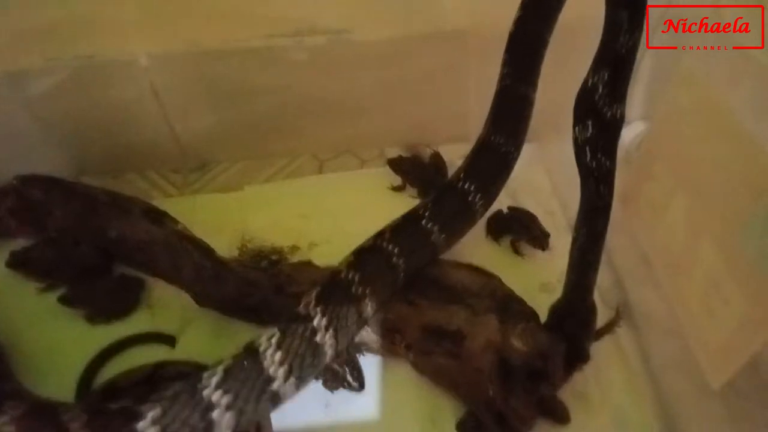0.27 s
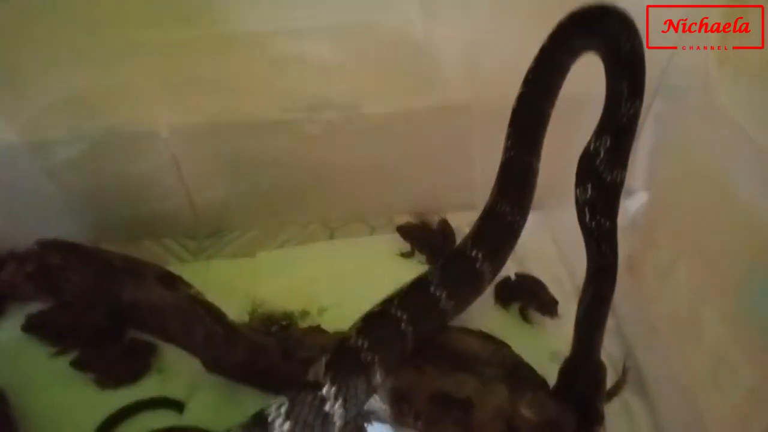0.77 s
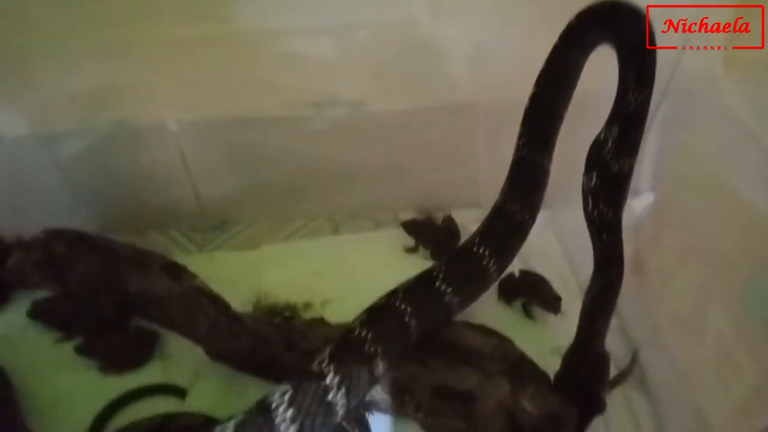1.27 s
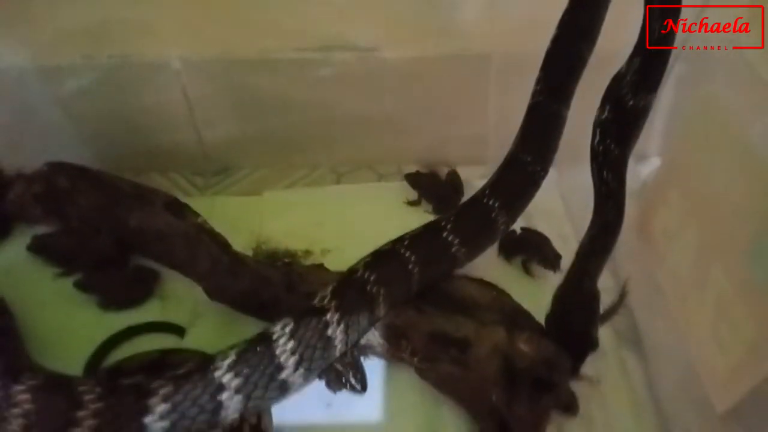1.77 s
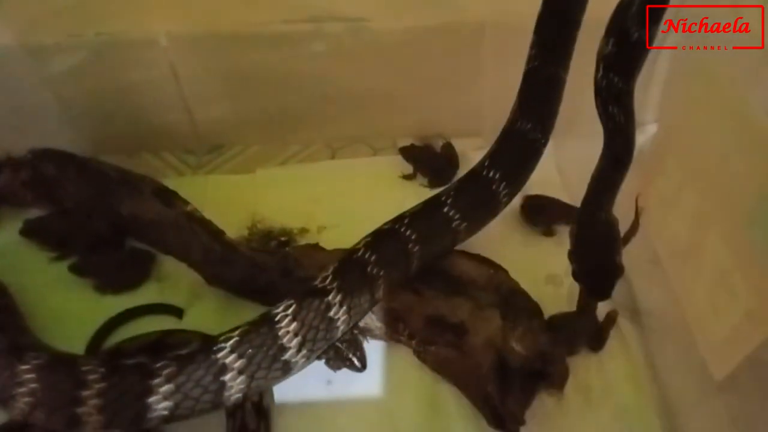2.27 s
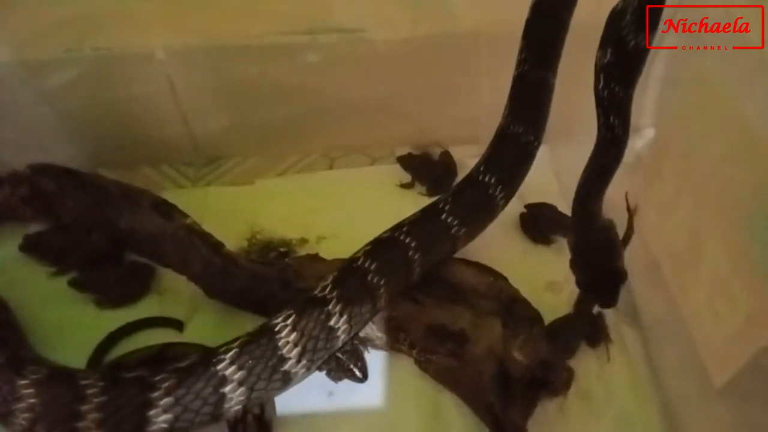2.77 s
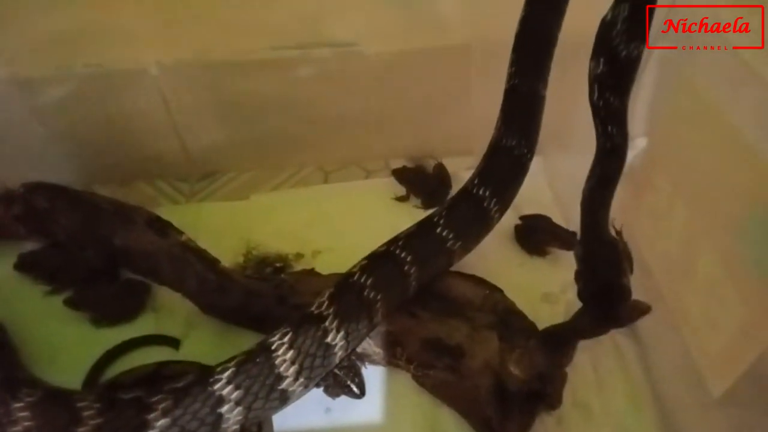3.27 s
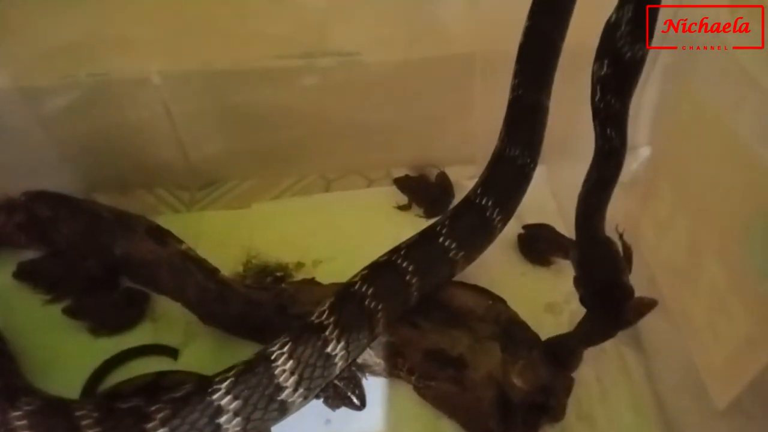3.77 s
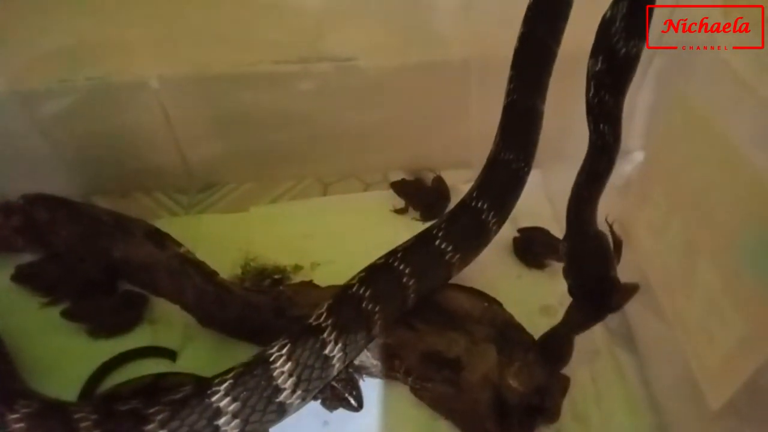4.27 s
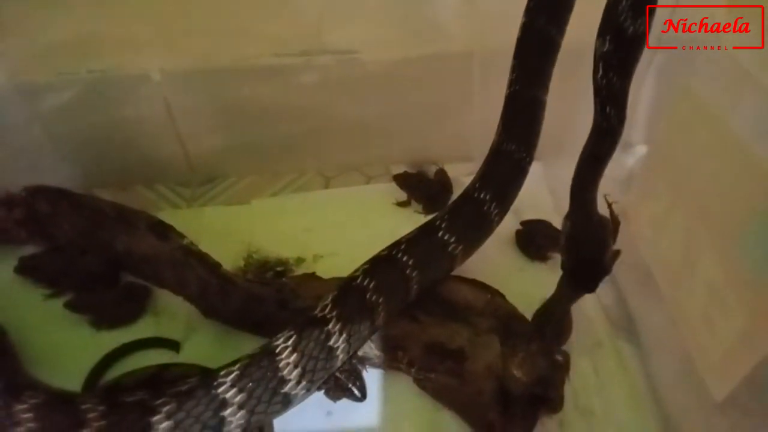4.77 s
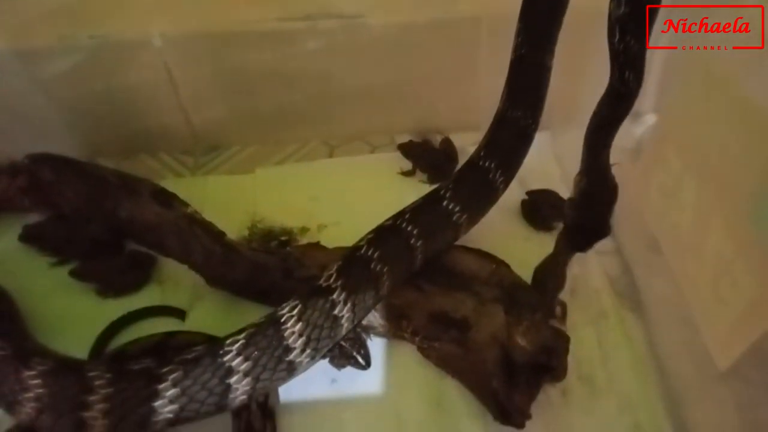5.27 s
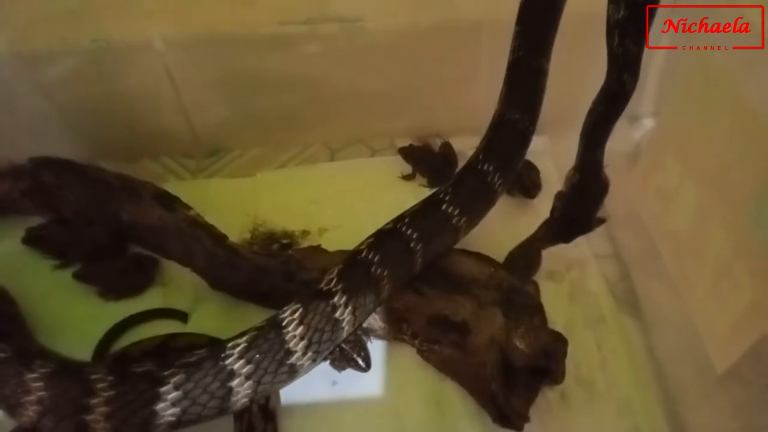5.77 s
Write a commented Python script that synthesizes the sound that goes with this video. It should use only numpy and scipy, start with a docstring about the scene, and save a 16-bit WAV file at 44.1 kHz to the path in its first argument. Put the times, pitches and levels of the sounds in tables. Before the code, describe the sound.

Faint rustling and a hoarse little croak lead into a harsh, shrill frog scream. A snake and the struggling frog slide and knock against a plastic tank, then the frog screams four more times in uneven bursts, with thin squeals and scattered clicks. The cries are loud and very near the microphone, with a boxy ring and a short room echo; the gaps are quiet.

```python
"""Frog seized by a snake

A small frog in a plastic tank screams five times, close to an overloaded microphone. Its larynx fires
rough pulses into throat and mouth resonances; thin squeals lead into some screams, and tank and room
ring after them. In between come croaks and dry ticks; the struggling animals slide, scrape and bump."""
import sys
import numpy as np
from scipy import signal
from scipy.fft import rfft, irfft
from scipy.io import wavfile

SR = 44100
rng = np.random.default_rng(int(sys.argv[2]) if len(sys.argv) > 2 else 0)


def digitize_waveform(pressure):
    """Quantize a signal to 16-bit integers and store it at the path in sys.argv[1].

    Rows of a 2-D input are taken as channels; values are limited to [-1, 1].
    """
    field = np.atleast_2d(pressure).T
    bounded = np.clip(field, -1, 1)
    quanta = np.round(bounded * 32767).astype(np.int16)
    wavfile.write(sys.argv[1], SR, quanta)


N = 264952
TIME = np.arange(N) / SR


def from_db(db):
    return 10 ** (np.asarray(db) / 20)


def unit_rms(x):
    return x / np.sqrt(np.mean(x ** 2) + 1e-20)


def columns_at(rows, t):
    """Each column of a curve table at times t."""
    times, *columns = np.transpose(rows)
    return [np.interp(t, times, column) for column in columns]


def at_hz(points, hz):
    """Table lookup on a log-frequency axis."""
    points_hz, values = np.transpose(points)
    return np.interp(np.log(hz + 1), np.log(points_hz), values)


def butter(x, hz, kind, order=2):
    return signal.sosfilt(signal.butter(order, hz, kind, fs=SR, output="sos"), x + 1e-18)


def add(out, start_s, sound):
    i = max(int(start_s * SR), 0)
    out[i:i + len(sound)] += sound[:max(N - i, 0)]


def wander(hz, samples=N):
    """Low-passed noise, rms 1."""
    return unit_rms(butter(rng.standard_normal(samples), hz, "low"))


def coloured_noise(colour):
    """Steady noise of a given spectrum, rms 1."""
    gain = from_db(at_hz(colour, np.fft.rfftfreq(N, 1 / SR)))
    return unit_rms(irfft(rfft(rng.standard_normal(N)) * gain, N))


def dying_noise(colour, t60s, tilt_db_per_octave=0):
    """Dense modes, each half octave decaying at its own rate; 1 s, energy 1."""
    t, out = TIME[:SR], 0
    edges_hz = 45 * 2 ** (np.arange(18) / 2)
    for low, high in zip(edges_hz, edges_hz[1:]):
        hz = np.sqrt(low * high)
        band = butter(rng.standard_normal(SR), [low, high], "band")
        gain = from_db(at_hz(colour, hz) + tilt_db_per_octave * np.log2(hz))
        out = out + band * gain * from_db(-60 * t / at_hz(t60s, hz))
    return out / np.linalg.norm(out)


# Snake's moves: (centre [s], half length [s], rumble [dB], rustle [dB])
BODY_MOVES = [(0.376, 0.17, -49.5, -53.5), (1.098, 0.25, -62.5, -56.5), (1.794, 0.22, -56.5, -70.5),
              (2.23, 0.096, -48, -51.5), (2.441, 0.107, -49.5, -49.5), (4.889, 0.11, -73.5, -57.5),
              (5.112, 0.026, -76, -50.5)]
# Sliding spectra: (frequency [Hz], density [dB])
RUMBLE_SPECTRUM = [(30, -16), (60, -7.5), (100, 5), (150, -3), (220, -19), (400, -20.5), (1000, -35.5),
                   (8000, -64.5)]
RUSTLE_SPECTRUM = [(200, -7.5), (800, -8), (1500, 7.5), (3500, 0.5), (5500, -15.5), (9000, -27.5),
                   (15000, -38)]


def sliding_bodies(rumble_floor_db=-67, rustle_floor_db=-75.5, hiss_db=-82, swell_db=2.5, grain_db=2.0):
    """Lumpy rumble and faint rustle swell with each move, over microphone hiss; all fade in and out."""
    rumble_gain, rustle_gain = from_db(rumble_floor_db), from_db(rustle_floor_db)
    for centre_s, half_s, rumble_db, rustle_db in BODY_MOVES:
        motion = np.exp(-((TIME - centre_s) / half_s) ** 2)
        rumble_gain = np.hypot(rumble_gain, from_db(rumble_db) * motion)
        rustle_gain = np.hypot(rustle_gain, from_db(rustle_db) * motion)
    swell = from_db(swell_db * wander(hz=2.7))
    grain = from_db(grain_db * wander(hz=40))
    hiss = from_db(hiss_db) * rng.standard_normal(N)
    rumble = rumble_gain * swell * coloured_noise(RUMBLE_SPECTRUM)
    rustle = rustle_gain * grain * coloured_noise(RUSTLE_SPECTRUM)
    fade_in = np.interp(TIME, (0.104, 0.12), (.01, 1))
    fade_out = from_db(-33.5 * np.maximum(TIME - 5.42, 0))
    return fade_in * fade_out * (hiss + rumble + rustle)


def ping(hz, width_hz, delay_s=0):
    """A damped resonance answers one pulse, swelling and dying in a few cycles; energy 1."""
    t = np.maximum(TIME[:SR // 100] - delay_s, 0)
    wave = t ** 2 * np.exp(-np.pi * width_hz * t) * np.sin(2 * np.pi * hz * t)
    return wave / np.linalg.norm(wave)


def twin_ping(hz, delay_s=0, width_hz=1400, upper_db=-2.5):
    """Two resonances either side of hz, moving together; energy 1."""
    lower = ping(hz * 0.904, width_hz, delay_s)
    upper = from_db(upper_db) * ping(hz * 1.2036, width_hz, delay_s)
    return (lower - upper) / np.linalg.norm(lower - upper)


# Ticks: (time [s], level before high-pass [dB], high ring re low ring [dB])
TICKS = [(0.209, -31, -15.5), (0.2626, -40.5, -14.5), (0.332, -30.5, -19), (0.411, -27.5, -6.5),
         (1.117, -19, -18), (1.1516, -20.5, -23), (2.111, -28, -10.5), (3.3794, -19, -16),
         (3.8421, -18, -14), (3.922, 0.5, -3.5), (4.3925, -31, -8.5), (4.8632, -13.5, -22),
         (4.9204, -26.5, -3), (5.0052, -37.5, -6)]


def ticks(gain_db=-0.5):
    """Faint ticks in the opening rustle, then scattered clicks; each a brief low and high ring."""
    out = np.zeros(N)
    for start_s, level_db, high_db in TICKS:
        pulse = ping(hz=1500, width_hz=610) + from_db(high_db) * twin_ping(hz=3100)
        add(out, start_s, from_db(level_db + gain_db) * pulse / np.abs(pulse).max())
    return butter(out, 1900, "high", order=4)


# Slips on the plastic: (centre [s], half length [s], level [dB])
SLIPS = [(0.405, 0.016, -58.5), (2.159, 0.029, -51.5), (2.509, 0.0063, -44.5), (3.098, 0.04, -59),
         (5.526, 0.013, -60)]
# Scrape spectrum: (frequency [Hz], density [dB])
SCRAPE_SPECTRUM = [(1000, -22), (3000, -6), (6500, 0.5), (10000, -20.5), (15000, -12.5)]


def scrapes(grain_db=4.0):
    """Scales and toes slip over the plastic with a bright, grainy hiss."""
    contact = sum(from_db(db) * np.exp(-((TIME - s) / half_s) ** 2) for s, half_s, db in SLIPS)
    grain = from_db(grain_db * wander(hz=150))
    return contact * grain * coloured_noise(SCRAPE_SPECTRUM)


def larynx(controls, low_cut_hz, flank_db, bite_db, bite_ratio, shimmer_db=7, rasp=0.08):
    """The larynx snaps open once a cycle; strain scatters the timing and strength of the snaps."""
    out, time_s = np.zeros(N), controls[0][0]
    for timing, strength, balance in np.clip(rng.standard_normal((400, 3)), -2, 2):
        if time_s > controls[-1][0]:
            break
        rate_hz, jitter, throat_db, throat_hz, mouth_db, mouth_hz = columns_at(controls, time_s)
        delay_s = time_s * SR % 1 / SR
        period_s = np.exp((jitter + 0.013) * timing / 2) / max(rate_hz, 20)
        scatter_db = shimmer_db * jitter
        throat = ping(throat_hz, width_hz=1300, delay_s=delay_s)
        throat *= from_db(throat_db + scatter_db * balance)
        mouth = from_db(mouth_db) * twin_ping(mouth_hz, delay_s)
        bite = ping(mouth_hz * bite_ratio, width_hz=1700, delay_s=delay_s)   # weak high resonance
        pulse = butter(throat + mouth, 1.5 * mouth_hz, "low", order=6)
        pulse += from_db(mouth_db + bite_db) * bite
        pulse *= 1 + rasp * rng.standard_normal(len(pulse))   # turbulence
        pulse *= np.sqrt(SR * period_s)   # longer cycles pass more air
        add(out, time_s, pulse * from_db(scatter_db * strength))
        time_s += period_s
    flanks = from_db(flank_db) * butter(out, (520, 860), "band", order=4)   # leak through the skin
    softened = butter(out, 5900, "low", order=4)
    return flanks + butter(softened, low_cut_hz, "high", order=8)   # a small body radiates no bass


# Croaks: (start [s], length [s], pulse rate [Hz], jitter [cycles], throat [dB], mouth [dB],
# bite re mouth [dB], low cut [Hz], flank leak [dB])
CROAK_PUSHES = [(0.543, 0.023, 305, 0.19, -20, -26, -13, 1100, -13),
                (0.581, 0.064, 295, .07, -14.5, -18, -13.5, 1100, -7),
                (2.131, 0.012, 330, 0.1, -29.5, -30.5, -22, 1268, -28),
                (3.888, 0.026, 200, .15, -21, -27, -19, 1290, -22)]


def croak(push, sag=0.16, arch_db=5.5, throat_hz=1510, mouth_hz=3100):
    """A hoarse push through a nearly closed mouth swells and fades as its pitch sags."""
    start_s, length_s, rate_hz, jitter, throat_db, mouth_db, bite_db, low_cut_hz, flank_db = push
    controls = []
    for progress in np.linspace(0, 1, 11):
        dip_db = arch_db * (2 * progress - 1) ** 2
        pitch_hz = rate_hz * (1 - sag * (progress - .5))
        controls.append((start_s + progress * length_s, pitch_hz, jitter,
                         throat_db - dip_db, throat_hz, mouth_db - dip_db, mouth_hz))
    return larynx(controls, low_cut_hz, flank_db, bite_db, bite_ratio=2.05)


# Screams: (start [s], mouth shuts [s], throat [dB], throat resonance [Hz], mouth [dB],
# mouth resonance [Hz], midway slack [dB], tiring loss [dB], bite re mouth [dB], low cut [Hz],
# flank leak [dB])
SCREAM_PUSHES = [(0.648, 0.914, -20.5, 1878, -9.5, 4026, -1, 10, -10, 1250, -6.5),
                 (2.678, 2.899, -17.5, 1557, -11.5, 3690, 3, 0, -7, 1410, -29),
                 (3.58, 3.644, -19, 1630, -13.5, 3470, -3.5, 1, -16, 1400, -16.5),
                 (3.972, 4.135, -19, 1595, -16.5, 3504, -2, -4, -16, 1400, -18),
                 (5.213, 5.357, -16.5, 1714, -10.5, 4083, 1.5, 1, -16, 1408, -22)]
# Pitch and strain, one curve per scream: (time [s], pulse rate [Hz], jitter [cycles])
SCREAM_CURVES = [
    [(0.65, 282, 0.087), (0.742, 401, 0.027), (0.815, 366, 0.043), (0.878, 260, 0.055), (0.915, 503, 0.049),
     (0.945, 380, .1)],
    [(2.678, 310, 0.15), (2.7, 333, 0.085), (2.77, 244, 0.14), (2.842, 409, 0.16), (2.852, 678, 0.064),
     (2.89, 684, 0.012), (2.916, 675, 0.13), (2.94, 460, 0.31)],
    [(3.58, 292, .13), (3.615, 401, 0.08), (3.69, 293, 0.2)],
    [(3.971, 55, 0.017), (4.004, 100, 0.011), (4.09, 146, 0.033), (4.125, 282, 0.093), (4.152, 380, 0.056),
     (4.18, 213, 0.29)],
    [(5.213, 321, 0.23), (5.27, 296, .18), (5.335, 600, 0.18), (5.346, 764, .02), (5.366, 730, 0.021),
     (5.385, 690, 0.15), (5.4, 520, .15)],
]


def scream(push, curve, release_s=0.044, throat_db_per_s=330, mouth_db_per_s=847.5):
    """One open-mouthed push darkens as the frog tires; the mouth shuts, the throat dies away after it."""
    (start_s, shut_s, throat_db, throat_hz, mouth_db, mouth_hz,
     slack_db, tiring_db, bite_db, low_cut_hz, flank_db) = push
    t = np.arange(start_s, shut_s + release_s, 0.001)
    progress = np.minimum((t - start_s) / (shut_s - start_s), 1)
    tired = progress ** 1.8
    since_shut_s = np.maximum(t - shut_s, 0)
    boom_db = 5 * np.exp(-((t - shut_s) / 0.021) ** 2)   # the throat booms as the mouth shuts
    loss_db = slack_db * np.sin(np.pi * progress) ** 2 + tiring_db * tired
    opening = 1 - 0.1 * tired - .009 * loss_db   # the mouth narrows as effort falls
    controls = np.column_stack([
        t, *columns_at(curve, t),
        throat_db + boom_db - throat_db_per_s * since_shut_s, throat_hz * (1 - 0.03 * tired),
        mouth_db - loss_db - mouth_db_per_s * since_shut_s, mouth_hz * opening])
    return larynx(controls, low_cut_hz, flank_db, bite_db, bite_ratio=1.4)


# Knocks on the tank: (time [s], relative level [dB], tilt [dB/octave])
KNOCKS = [(1.17, -42.5, -12.5), (1.647, -53, 8.5), (2.136, -29.5, 2), (2.157, -12, -1.5), (2.33, -25, -2),
          (2.365, -29, 6)]
# Wall spectrum: (frequency [Hz], density [dB])
WALL_SPECTRUM = [(40, -12.5), (100, 7), (220, -4.5), (380, 0.5), (550, 2.5), (800, 5), (1150, 1),
                 (1800, 4.5), (3000, -1), (5000, -27), (8000, -51.5), (14000, -43)]
# Wall decay: (frequency [Hz], T60 [s])
WALL_DECAY = [(80, 0.07), (400, 0.17), (1500, 0.06), (8000, 0.02)]


def bumps(gain_db=24.5):
    """Bodies knock on the plastic: a short slap, the low mids ringing longest."""
    out = np.zeros(N)
    for start_s, level_db, tilt in KNOCKS:
        add(out, start_s, from_db(level_db + gain_db) * dying_noise(WALL_SPECTRUM, WALL_DECAY, tilt))
    return out


# Squeals: (start [s], end [s], pitch [Hz], start offset [fraction], end offset [fraction],
# final level [dB], second harmonic re first [dB])
THIN_SQUEALS = [(2.493, 2.679, 4205, 0.32, 0.1, -34.5, -27), (3.528, 3.573, 1880, -0.086, 0.21, -43, -2),
                (5.081, 5.213, 4570, .28, .1, -28, -40.5), (5.906, 5.942, 2647, -0.083, -0.16, -58, -1.5)]


def squeal(start_s, end_s, pitch_hz, start_offset, end_offset, final_db, second_db,
           settle_s=.022, swell_db=12, swell_s=0.02, flutter_db=3.5):
    """Tight vocal folds catch roughly, then settle on a thin, unsteady tone that bends at the end."""
    t = np.arange(0, end_s - start_s, 1 / SR)
    hz = pitch_hz * (1 + start_offset * np.exp(-t / settle_s) + end_offset * (t / t[-1]) ** 4.3)
    wobble = wander(hz=400, samples=SR)[:len(t)]
    flutter = wander(hz=60, samples=SR)[:len(t)]
    wobble_depth = .005 + 0.018 * np.exp(-t / 0.016)
    phase = 2 * np.pi * np.cumsum(hz * (1 + wobble_depth * wobble)) / SR
    overtones = from_db(second_db) * np.sin(2 * phase) + from_db(2 * second_db - 9) * np.sin(3 * phase)
    level_db = final_db - swell_db * (np.exp(-t / swell_s) - np.exp(-t[-1] / swell_s))
    envelope = from_db(level_db + flutter_db * flutter) * signal.windows.tukey(len(t), .03)
    out = np.zeros(N)
    add(out, start_s, (np.sin(phase) + overtones) * envelope)
    return out


# Standing waves between the walls: (frequency [Hz], width [Hz], relative gain [dB])
STANDING_WAVES = [(1413, 130, 4.5), (1676, 16, 1), (1848, 100, 1), (2123, 120, 7), (2445, 65, 7.5),
                  (2724, 70, 4.5), (2864, 84, 4), (3124, 91, 6.5), (3440, 35, -4), (3220, 19, -10.5),
                  (3970, 270, -5), (4285, 63, -4.5), (4780, 13, -7.5), (4695, 520, 2)]


def tank(x, trip_s=.00288, bounce=0.59, modes_db=-3.0, scatter_db=-5.0, scatter_s=0.0095):
    """Round trips between the walls repeat each pulse and build standing waves; later echoes scatter."""
    loop = np.r_[1, np.zeros(int(trip_s * SR)), -bounce]
    repeated = signal.lfilter(loop[::-1], loop, x + 1e-18)   # all-pass
    out = repeated.copy()
    for hz, width_hz, db in STANDING_WAVES:
        radius = np.exp(-np.pi * width_hz / SR)
        poles = [1, -2 * radius * np.cos(2 * np.pi * hz / SR), radius ** 2]
        mode = (1 - radius ** 2) / 2 * signal.lfilter([1, 0, -1], poles, repeated)
        out += from_db(db + modes_db) * mode
    t = TIME[:SR // 10]
    echoes = rng.standard_normal(len(t)) * np.exp(-t / scatter_s) * (t > .0008)
    return out + from_db(scatter_db) * signal.fftconvolve(out, echoes / np.linalg.norm(echoes))[:N]


# Room spectrum: (frequency [Hz], density [dB])
ROOM_SPECTRUM = [(200, 3), (800, 0), (1500, 0), (3000, -2.5), (5000, -17), (12000, -4)]
# Room decay: (frequency [Hz], T60 [s])
ROOM_DECAY = [(300, 1), (1400, 0.52), (3000, 0.49), (4500, 0.85), (7000, 0.53), (14000, 0.13)]


def room(x, wet_db=-22.0, build_s=0.012):
    """Diffuse tail of the room around the tank."""
    tail = dying_noise(ROOM_SPECTRUM, ROOM_DECAY) * (1 - np.exp(-TIME[:SR] / build_s))
    return from_db(wet_db) * signal.fftconvolve(x, tail)[:N]


def scene(escape_db=-3.0):
    """The frog calls in the tank; the room answers the tank and what escapes through its open top."""
    direct = sum(scream(push, curve) for push, curve in zip(SCREAM_PUSHES, SCREAM_CURVES))
    direct += sum(croak(push) for push in CROAK_PUSHES)
    direct += ticks()
    direct += sum(squeal(*row) for row in THIN_SQUEALS)
    inside = tank(direct) + bumps() + scrapes()
    reverb = room(inside) + room(from_db(escape_db) * direct)
    return (inside + reverb + sliding_bodies())[None]


def record(dry, clip_level=0.93, rolloff_hz=14000, cutoff_hz=15900):
    """The screams overload the input; the top treble is rolled off, then cut."""
    clipped = np.clip(dry, -clip_level, clip_level)
    steep_lowpass = signal.ellip(12, .1, 95, cutoff_hz, fs=SR, output="sos")
    return signal.sosfilt(steep_lowpass, butter(clipped, rolloff_hz, "low"))


dry = scene()
out = record(dry)
digitize_waveform(out)
```